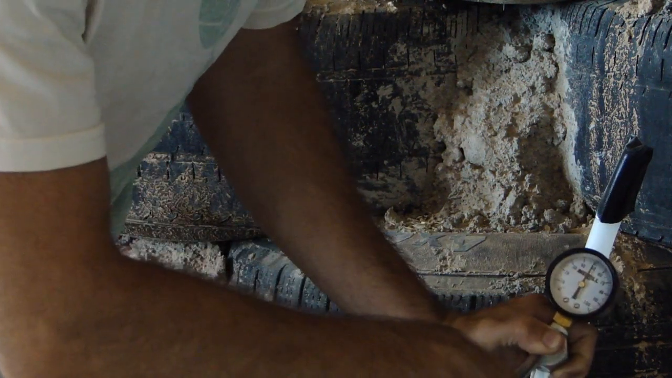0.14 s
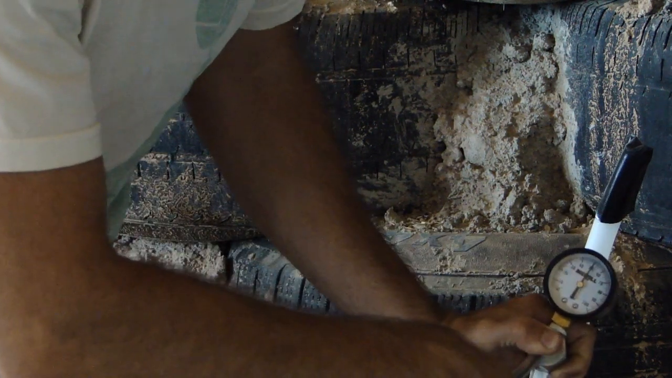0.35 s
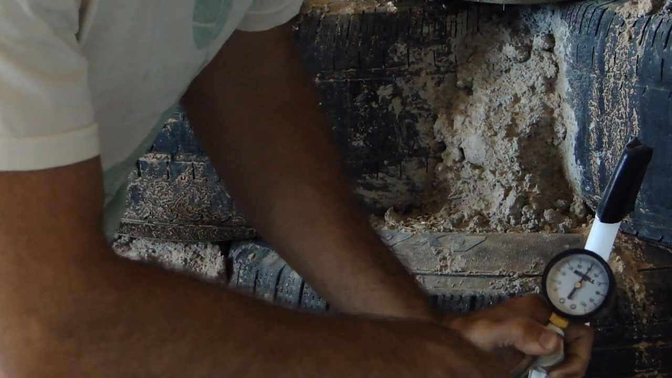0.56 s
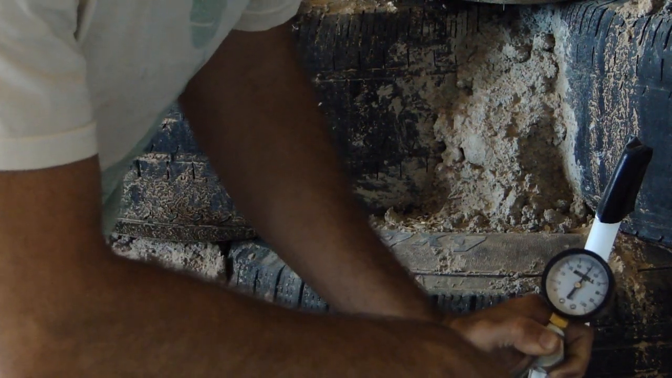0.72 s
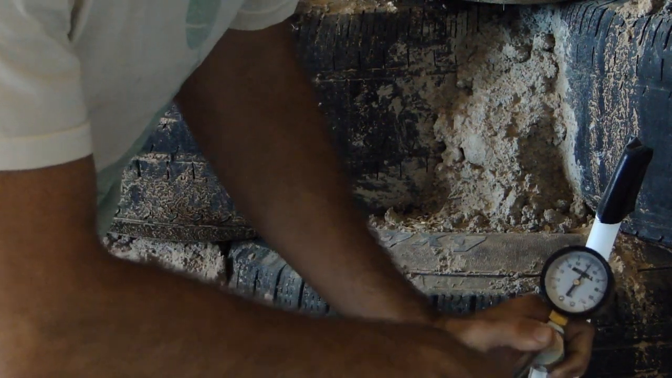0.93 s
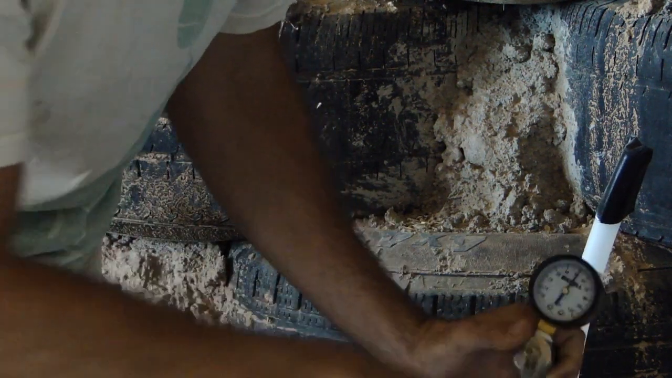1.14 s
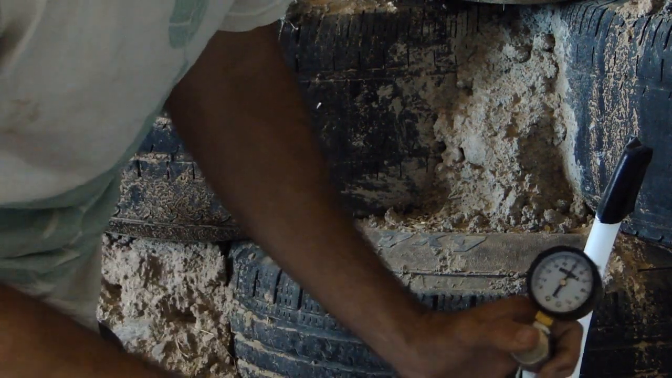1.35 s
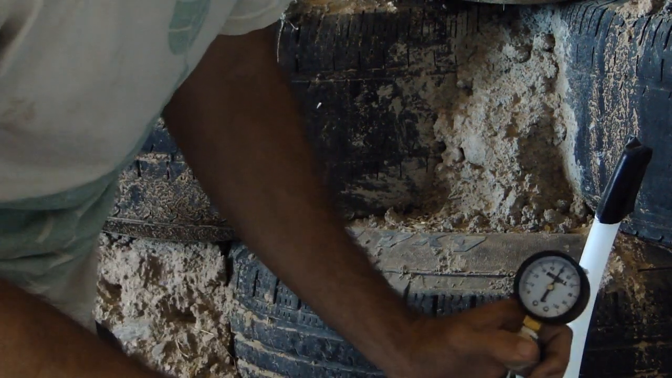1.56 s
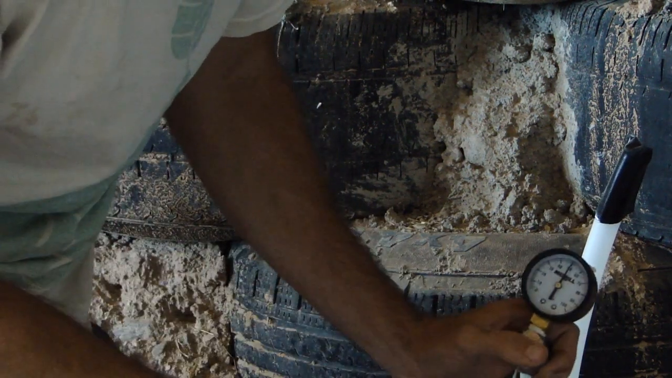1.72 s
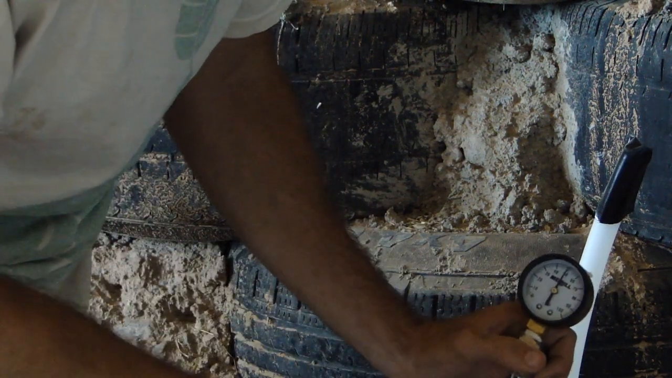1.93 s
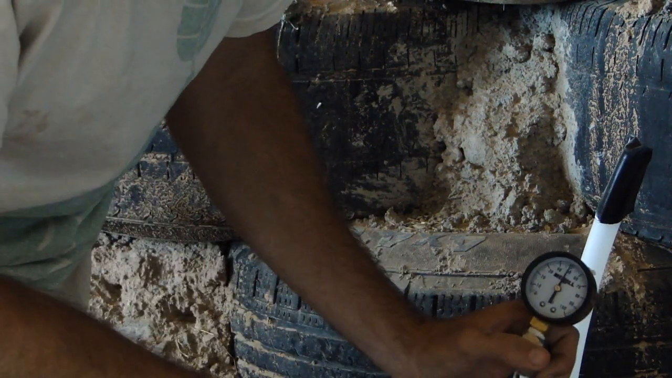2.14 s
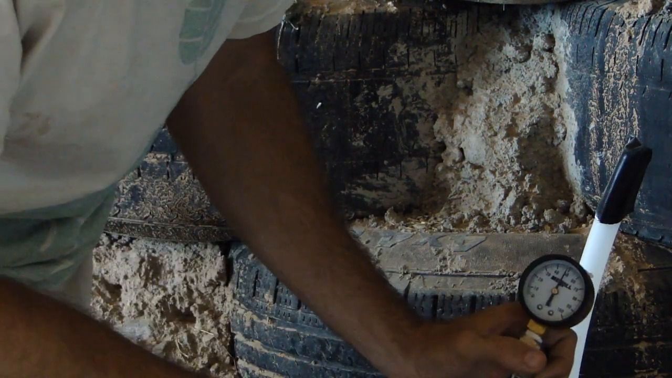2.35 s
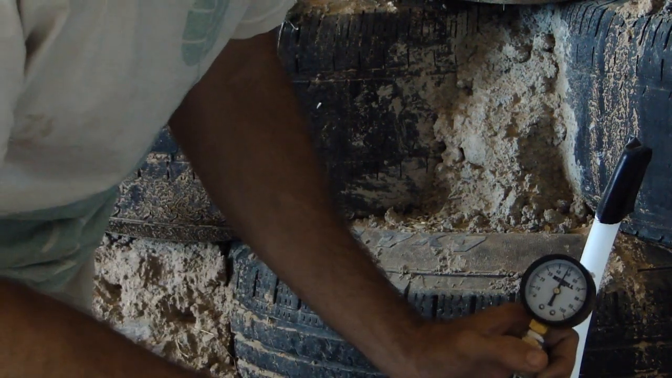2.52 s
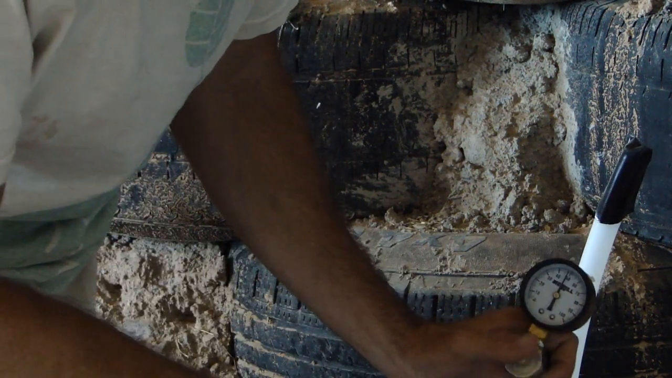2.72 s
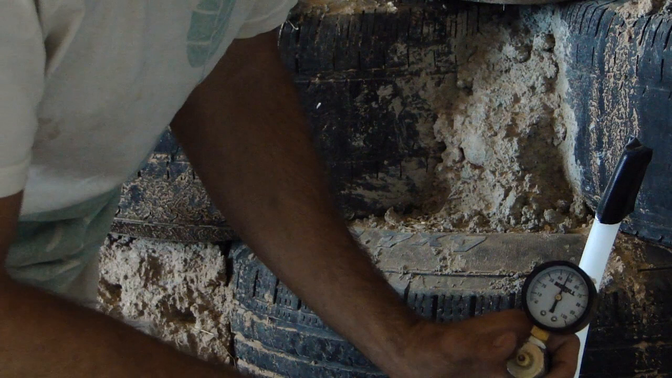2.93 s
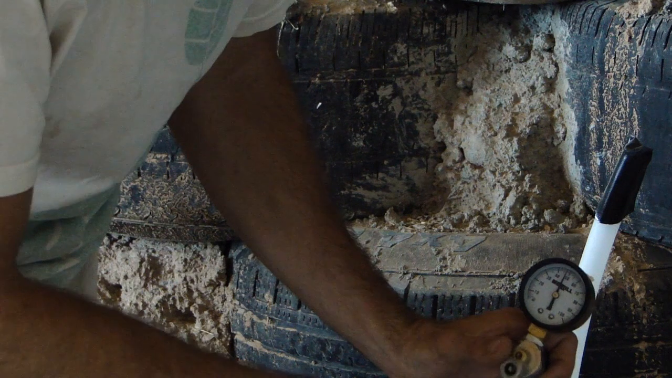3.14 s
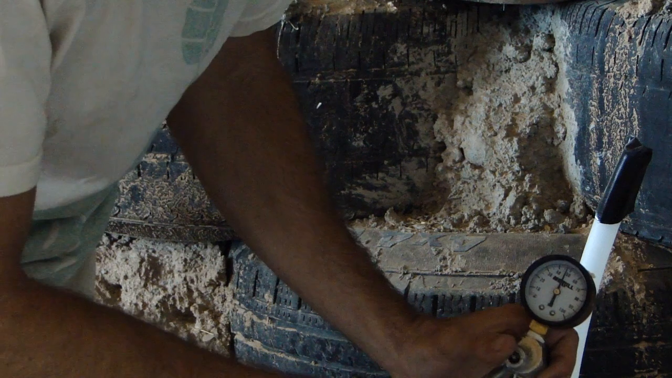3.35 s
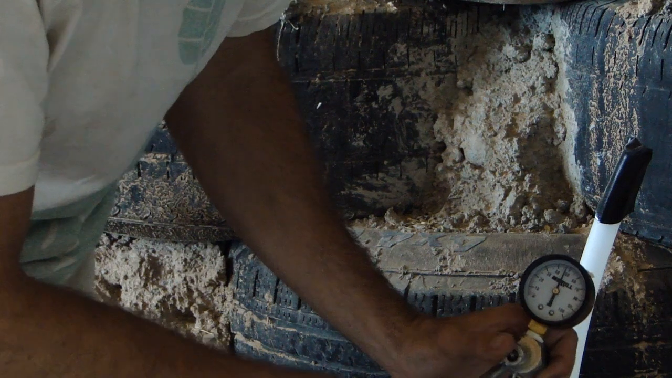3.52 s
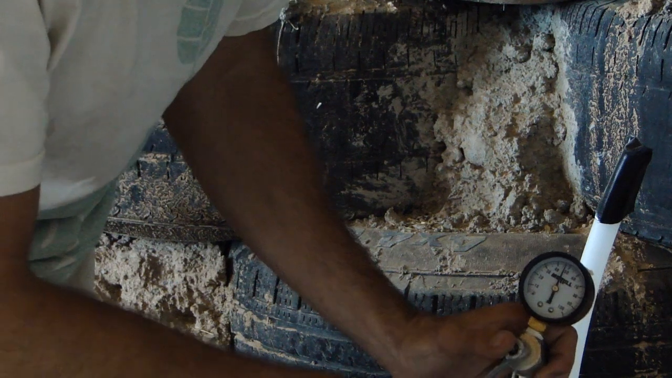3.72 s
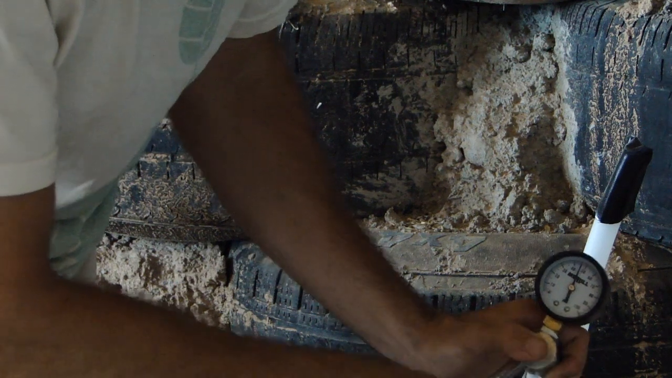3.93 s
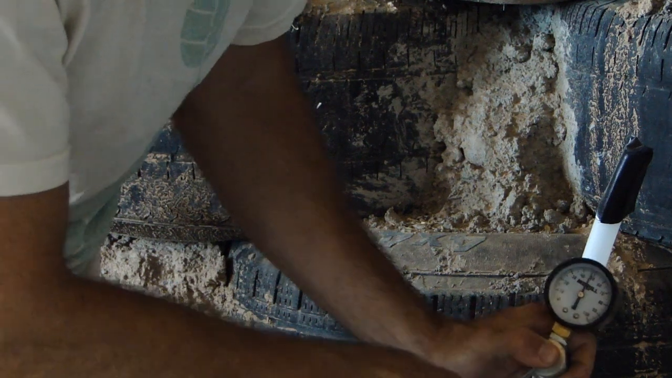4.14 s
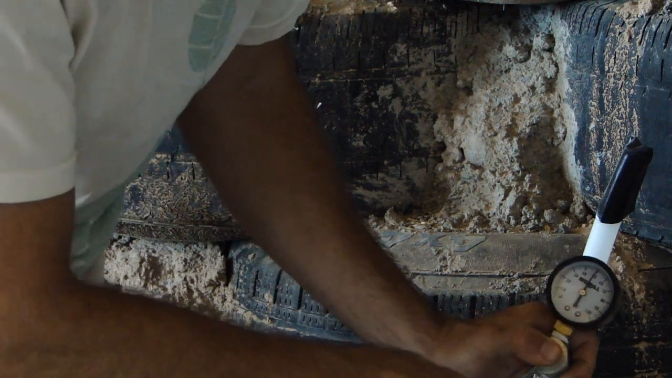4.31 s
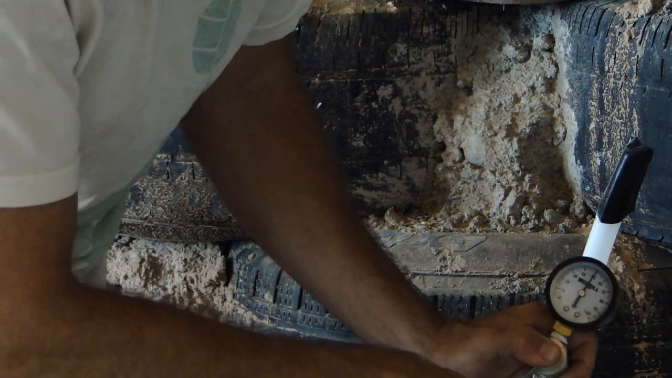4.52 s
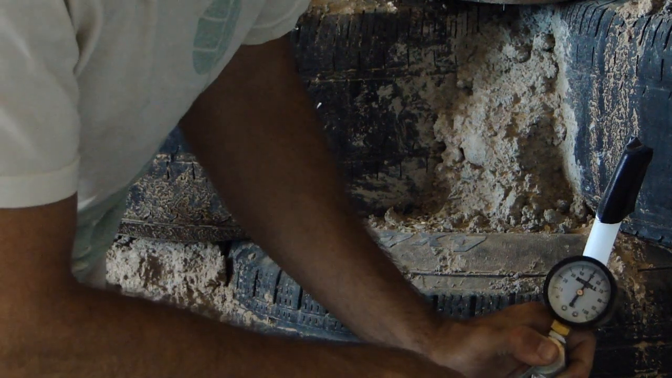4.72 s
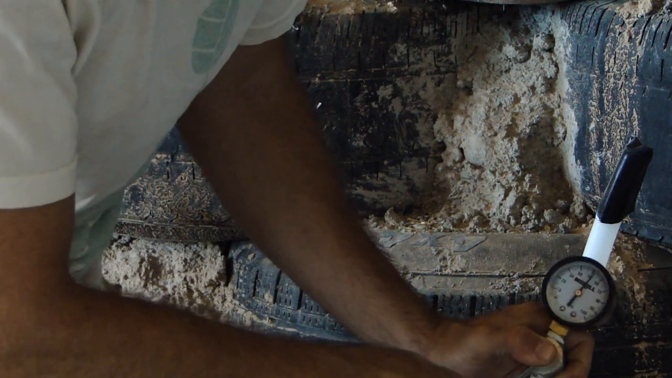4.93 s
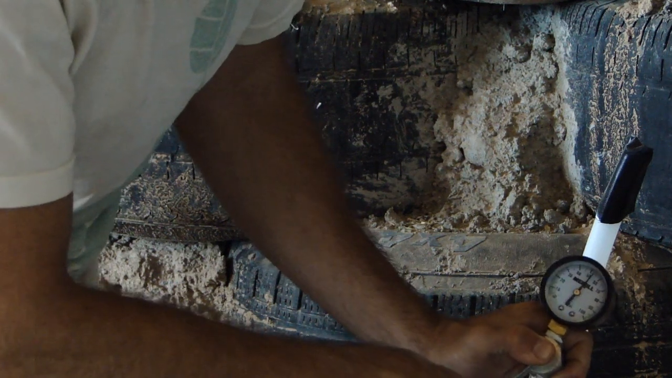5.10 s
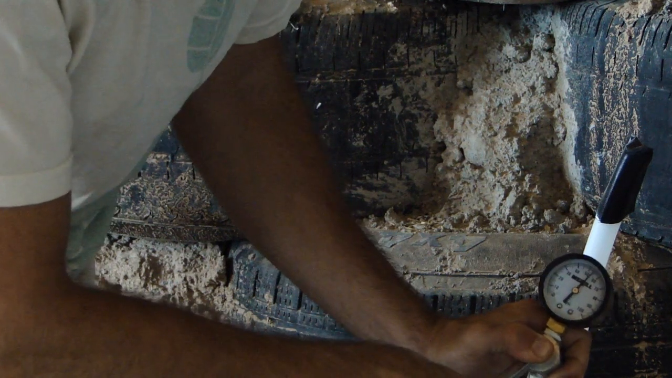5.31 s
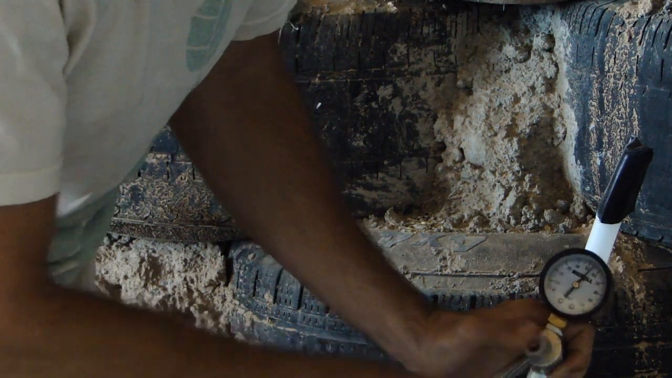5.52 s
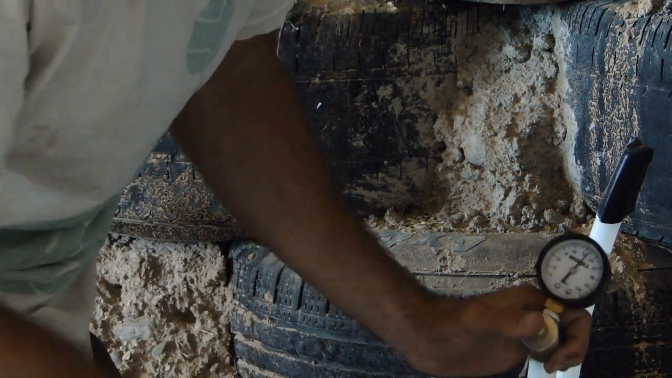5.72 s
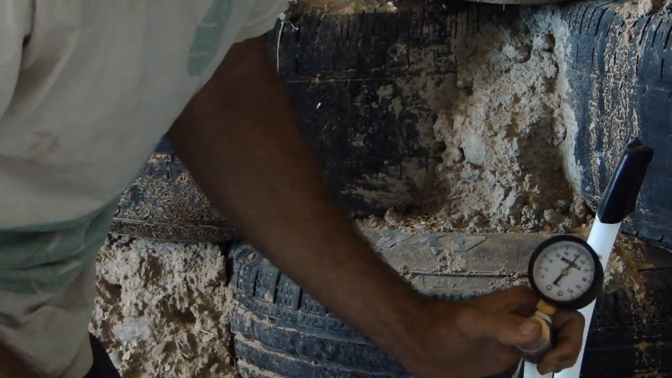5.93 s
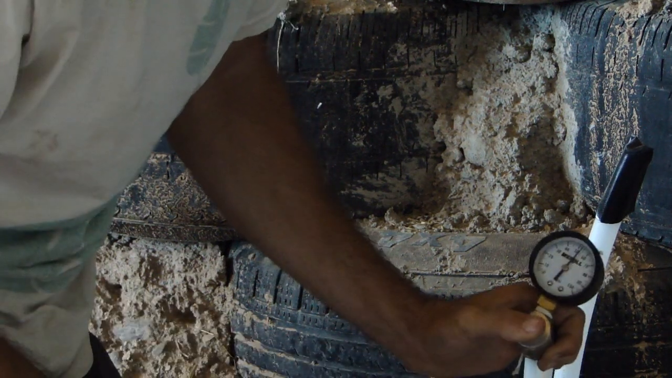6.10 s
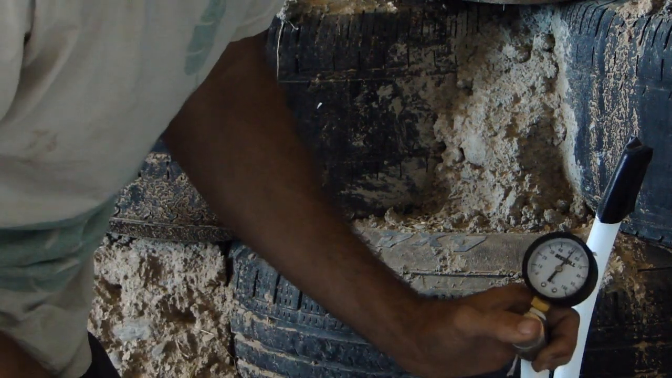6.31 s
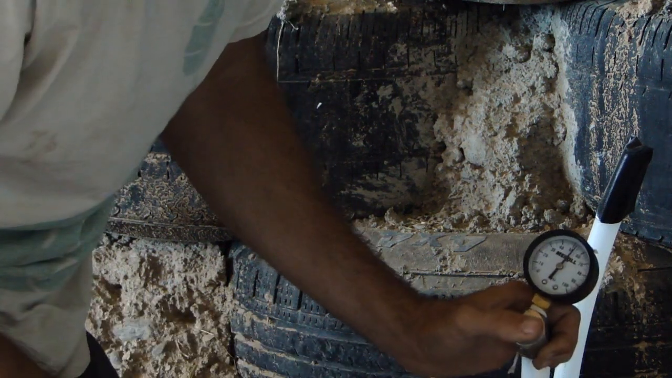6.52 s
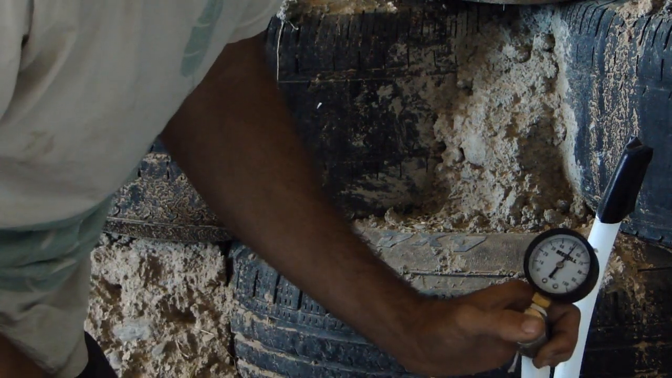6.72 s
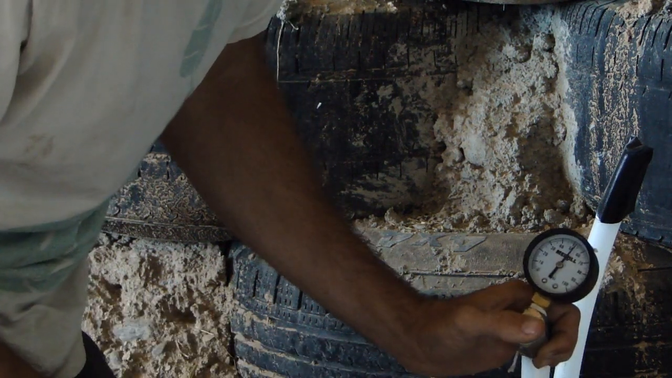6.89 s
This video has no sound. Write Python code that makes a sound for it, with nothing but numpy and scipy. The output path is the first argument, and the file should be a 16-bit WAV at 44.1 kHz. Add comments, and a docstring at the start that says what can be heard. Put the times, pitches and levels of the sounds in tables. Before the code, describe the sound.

In a small rough-walled room, heard close in stereo, air seeps past a rubber seal with a fine hiss and a thin, wavering, fading whistle. A soft brass scrape and dull knock come at 0.7 s, then at 0.9 s a sharp, bright blast of compressed air, about a fifth of a second, with a low rush inside it. A very faint whistle trails near 1.1-1.25 s. Quiet handling follows: a scrape and bump at 1.35, a dull knock at 1.9, tiny ticks around 2.9-3.6. At 3.73 s a softer spurt with a squeak runs into a second, brighter puff at 3.9. From 4.1 s fine hiss leaks again, with a scrape at 4.4 and a growing whistle, until another strong, short blast at 5.42. A faint whistle resumes at 5.67 and stops near 6.2; a soft knock at 6.4 leaves quiet background and barely audible far hum.

```python
"""Blasts of compressed air escape as an air chuck is seated on, or pulled off, the valve of a pipe's test gauge.
The place is a small rough-walled room; the valve sits close to a stereo pair of microphones.
Each blast is a bright noise jet ringing the cavities, with a low rush swelling behind it.
Between blasts, filtered noise seeps past the seal and the valve whistles thinly; short brass ticks,
dull knocks on the pipe and a quiet diffuse background with a faint far hum fill in."""
import sys
import numpy as np
from scipy import signal
from scipy.fft import rfft, irfft, next_fast_len
from scipy.io import wavfile
from scipy.ndimage import uniform_filter1d

SR = 44100
rng = np.random.default_rng(int(sys.argv[2]) if len(sys.argv) > 2 else 0)


def output_pcm(signal):
    """Save a mono or channel-first signal as 16-bit PCM at the path in sys.argv[1].

    Samples are clipped to [-1, 1] before scaling.
    """
    pcm = np.clip(np.atleast_2d(signal).T, -1, 1) * 32767
    wavfile.write(sys.argv[1], SR, np.round(pcm).astype(np.int16))


N = 306759
TIME = np.arange(N) / SR   # s
PADDED = next_fast_len(N, real=True)
FREQS = np.fft.rfftfreq(PADDED, 1 / SR)   # Hz

# Levels in the tables are relative: each layer's own level and the room mix come on top.
# Blasts of air [t/s, attack/s, hold from the start/s, jet level/dB, sag while held/(dB/s),
#   time the rush swells/s, rush level/dB, low edge of the rush f/Hz, lift of the cavity ring/dB]
BLASTS = [ (0.901, 0.027, 0.09, -10, 68.5, 0.067, -27, 120, 5.5),
          (3.734, 0.045, 0.17, -17.5, 5, .09, -34.5, 270, 7.5),
          (3.901, 0.02, 0.08, -13.5, 47, 0.08, -41.5, 185, 1.5),
          (5.424, 0.021, 0.08, -10, 72, 0.088, -28.5, 140, 0)]
# Jet colour, one list per blast, set by the angle of the chuck [f/Hz, level/dB per Hz]
JET_COLOURS = [
    [(240, -52), (400, -21.5), (524, -10), (1080, -8), (1280, -1), (2650, -6), (3150, -1), (6790, -3),
     (10900, -0.5), (12000, -8), (15600, -40.5), (22000, -120)],
    [(240, -47), (400, -26), (738, -17.5), (827, -13.5), (2270, -6.5), (2400, -8), (4430, -1.5), (6600, -3),
     (7190, -0.5), (12000, 0), (15600, -32), (22000, -120)],
    [(240, -50.5), (400, -32), (980, -11), (1070, -16.5), (1210, -7), (2210, -2.5), (2980, 0.5), (6600, -1),
     (11000, 0), (12000, -2.5), (15600, -38.5), (22000, -120)],
    [(240, -46.5), (400, -32.5), (697, -17), (850, -12.5), (3150, -0.5), (3530, -2), (6330, -3),
     (7090, -5.5), (11000, -1.5), (12000, -10.5), (15600, -40), (22000, -120)],
]
# Dull rush behind the jet [f/Hz, level/dB per Hz]
RUSH_COLOUR = [(140, -3.5), (220, -2), (400, 2), (700, 1), (1000, 5), (1400, 5), (2200, 10), (5000, -42)]
# Pipe resonances in which the rush booms [f/Hz, width/Hz, level/dB]
PIPE_MODES = [(174.8, 14, 11), (308, 72, 3), (395, 34, 5.5), (529.7, 48, 9), (800, 190, 2.5),
              (991, 60, -8.5)]
# Resonances of the chuck and valve cavities [f/Hz, width/Hz, level/dB]
CAVITIES = [(1284, 36, -1), (1746, 30, -13), (2480, 35, 3.5), (2660, 27.7, 1), (2848, 25, 0), (3216, 18, 8),
            (4210, 110, -2), (4603, 29, -4), (5060, 61, 2), (5446, 35, -5.5), (6270, 44, -4),
            (6750, 77, -6.5), (7480, 54, -13.5), (9170, 24, -12.5), (9130, 40, -15), (9870, 60, -4),
            (10550, 40, -5), (11200, 110, 0.5), (11405, 30, 0.5)]
# Reflection off the hand [delay/s, strength]
HAND_ECHO = [(.00422, -0.073)]
# Chuck on the valve, air seeping past its seal [start t/s, end t/s, level/dB]
SEEPS = [(-.2, 0.913, -52), (4.09, 5.42, -52)]
# Colour of the seepage [f/Hz, level/dB per Hz]
SEEP_COLOUR = [(60, -43.5), (400, -9), (1500, -15), (3000, -15), (3900, -8), (4700, -7.5), (6300, -16.5),
               (7200, -11), (8400, -13.5), (9050, -14.5), (9900, -4.5), (10500, -3), (11200, -5.5),
               (11900, -8.5)]
# Edge tones of the seal [f/Hz, width/Hz, level/dB]
SEEP_TONES = [(3600, 100, -8.5), (4300, 70, -2), (5660, 120, -10), (6050, 60, 5.5), (6770, 50, -0.5),
              (7000, 76, -3.5), (7800, 70, 0), (8930, 35, 3), (9290, 90, 6), (9900, 40, -0.5),
              (10050, 45, -4.5), (10520, 70, -5.5), (10980, 60, -4)]
# Squeaks of the seal as it beds in [t/s, level/dB, f/Hz]
SQUEAKS = [(.325, -52, 4400), (3.743, -24, 5415), (4.145, -44, 4370)]
# Reflections off the gauge and the wall behind it [delay/s, strength]
NEAR_ECHOES = [(.00063, -.17), (.00119, -.15), (.00281, .2), (.00324, .17), (.0052, -.2)]
# Air flowing through the valve core [start t/s, end t/s, level at the start/dB, change/(dB/s)]
VALVE_FLOWS = [(-.05, .89, -55.5, -8), (1.122, 1.253, -58.5, -22), (4.4, 5.42, -73, 13.5),
               (5.67, 6.23, -56.5, -5)]
# Resonances of the valve core [f/Hz, width/Hz, level/dB]
VALVE_MODES = [(2090, 63, -1), (2172, 32, -1.5), (2480, 300, -21.5), (3970, 230, -3.5), (4430, 300, -16),
               (3515, 200, -8.5), (5180, 200, -25), (5500, 260, -10.5), (6380, 90, -18.5), (7060, 260, -18),
               (8530, 600, -12)]
# Fittings touching [t/s, level/dB, swell/s, ring of the valve body/dB, contact f/Hz, contact level/dB]
TICKS = [(.705, -45.5, .012, -25, 800, 2.5), (1.35, -41, 0.022, -12, 2600, -6),
         (2.880, -52.5, .0002, -25, 3030, 9), (2.883, -52, .0002, -21, 2320, 2),
         (3.005, -57, 0.011, -23, 3170, 10), (3.225, -38.5, 0.0063, 5.5, 623, -1.5),
         (3.364, -47, 0.0132, -8, 613, 5), (3.435, -45.5, 0.0098, -22.5, 4240, -3),
         (3.608, -39.5, 0.0011, 1.5, 2800, -6), (4.409, -35, 0.01, -25, 1330, 2),
         (4.426, -53.5, 0.0027, -20, 3230, 11)]
# Colour of the fittings' scrape [f/Hz, level/dB per Hz]
SCRAPE_COLOUR = [(60, -33), (200, -25), (600, 1.5), (1400, 1), (3100, 3), (4400, -6), (7000, -12.5),
                 (12000, -15)]
# Soft knocks of hands on the pipe [t/s, level/dB]
BUMPS = [(.71, -58), (1.355, -49.5), (1.865, -44.5), (3.056, -48.5), (6.41, -44.5)]
# Colour of the knocks [f/Hz, level/dB per Hz]
BUMP_COLOUR = [(50, -44), (110, -15), (190, -10), (290, 9.5), (450, -2), (800, -11.5), (2500, -38),
               (8000, -48)]
# Decay of the room by 60 dB [f/Hz, decay t/s]
ROOM_T60 = [(150, 0.2), (1000, 0.3), (4000, 0.29), (11000, 0.12)]
# Room reflections: the long waves reach both microphones alike [f/Hz, left-right likeness]
ROOM_LIKENESS = [(150, 0.91), (600, .45), (1400, 0.36), (3000, .1), (6000, -.05), (10000, -.3)]
# Colour of the background [f/Hz, level/dB per Hz]
AMBIENCE_COLOUR = [(15, -64), (25, -35), (96, -17), (127, -8), (276, -1.5), (527, -2), (569, -2), (883, -4),
                   (1140, -6.5), (1340, -6), (2070, -9), (2360, -11), (9270, -22.5), (11100, -23.5),
                   (12000, -41.5), (15600, -65.5), (22000, -120)]
# Likeness of the background at the two microphones [f/Hz, left-right likeness]
AMBIENCE_LIKENESS = [(60, 0.23), (170, 0.43), (500, 0.05), (1460, 0.2), (4230, 0.52), (12300, 0.75)]
# Faint far hum [f/Hz, level/dB]
HUM = [(586.8, -71.5), (1168, -74.5)]

JET_FALL_DB_PER_S = 208   # once the hold is over, the pressure drains
RUSH_RISE_DB_PER_S, RUSH_FALL_DB_PER_S = 150.5, 113.5
BLAST_S, SHUT_DB_PER_S = 0.24, 449.5   # the gap shuts this long after it opened, and this fast
BEDDING_DB, BEDDING_S = 3, 0.17   # a fresh seal leaks this much more, until the rubber beds in
LEAK_ATTACK_S, LEAK_FALL_DB_PER_S = 0.014, 109.5   # seep and whistle start and stop alike
BODY_T60 = 0.07   # ring of the valve body, s
AMBIENCE_DB = -56   # rms of the background, left and right averaged
CUTOFF_HZ = 11880


def blasts(jet_db=0.0, rush_db=-0.5, dull_hz=4500, dulls_below_db=-1.0):
    """A jet rings the cavities and dulls as pressure falls; a low, lumpy rush swells as the gap widens."""
    out = 0
    rush_gain = colour(RUSH_COLOUR) * resonant(PIPE_MODES + CAVITIES, lift_db=6.0)
    lumps = flutter(rate_hz=21, depth_db=3.0)
    low_pass = signal.butter(1, dull_hz, fs=SR, output="sos")
    for blast, spectrum in zip(BLASTS, JET_COLOURS):
        start, attack, hold, db, sag, swell, swell_db, edge_hz, ring_db = blast
        flow = envelope(start, attack, hold, -sag, JET_FALL_DB_PER_S)
        bright = noise(colour(spectrum) * resonant(CAVITIES, ring_db) * comb(HAND_ECHO))
        dull = signal.sosfilt(low_pass, bright)
        force = np.minimum(flow / from_db(dulls_below_db), 1) ** 0.45
        jet = from_db(jet_db + db) * flow * (force * bright + (1 - force) * dull)

        gap = envelope(start, attack, swell, RUSH_RISE_DB_PER_S, RUSH_FALL_DB_PER_S)
        above_edge = FREQS ** 4 / (FREQS ** 4 + edge_hz ** 4)
        rush = from_db(rush_db + swell_db) * gap / gap.max() * lumps * noise(rush_gain * above_edge)

        shut = from_db(-SHUT_DB_PER_S * np.maximum(TIME - start - BLAST_S, 0))
        out = out + shut * (jet + rush)
    return out * flutter(rate_hz=31, depth_db=0.5)


def seep(level_db=6.0, squeak_width_hz=110, squeak_t60=0.327):
    """Fine hiss through the narrow gap at the rubber seal, easing as it beds in, with brief squeaks."""
    flow = 0
    for start, end, db in SEEPS:
        fresh = np.exp(-np.maximum(TIME - start, 0) / BEDDING_S)
        opening = envelope(start, LEAK_ATTACK_S, end - start, 0, LEAK_FALL_DB_PER_S)
        flow = flow + from_db(db + BEDDING_DB * fresh) * opening
    hiss = noise(colour(SEEP_COLOUR) * resonant(SEEP_TONES, lift_db=4.0) * comb(NEAR_ECHOES))
    squeaks = 0
    for start, db, hz in SQUEAKS:
        tone = noise(peak(hz, squeak_width_hz) ** 2)
        squeaks = squeaks + from_db(db) * strike(start, 0.0061, squeak_t60) * tone
    return from_db(level_db) * flow * hiss * flutter(rate_hz=15, depth_db=2.0) + squeaks


def whistle(level_db=0.0, hiss_db=-4.5):
    """Turbulence in the valve core hisses and excites its resonances: a thin, wavering whistle."""
    flow = 0
    for start, end, db, slope in VALVE_FLOWS:
        opening = envelope(start, LEAK_ATTACK_S, end - start, slope, LEAK_FALL_DB_PER_S)
        flow = flow + from_db(db) * opening
    tones = 0
    for hz, width, db in VALVE_MODES:
        tones = tones + from_db(db) * steadier(noise(peak(hz, width) ** 2), share=0.4)
    hiss_gain = colour([(100, -34.5), (2000, 1.0), (6000, -4), (11500, -6)])
    hiss = noise(hiss_gain * resonant(CAVITIES, lift_db=9.5) * comb(NEAR_ECHOES))
    wavering_flow = flow * flutter(rate_hz=9, depth_db=1.5)
    return from_db(level_db) * wavering_flow * (tones + from_db(hiss_db) * hiss)


def ticks(ring_hz=2090, scrape_t60=0.059, contact_width_hz=400):
    """Brass meets brass with a short scrape, pitched by the spot touched, and the valve body rings on."""
    out = 0
    scrape = noise(colour(SCRAPE_COLOUR) * comb(NEAR_ECHOES))
    no_bass = colour([(60, -29), (400, 9.0)])   # small parts radiate no long waves
    for start, db, swell, ring_db, hz, contact_db in TICKS:
        contact = from_db(contact_db) * noise(no_bass * peak(hz, contact_width_hz) ** 2)
        cycles = ring_hz * (TIME - start) + rng.random()
        ring = from_db(ring_db) * np.sin(2 * np.pi * cycles)
        # a gentle touch also slides on for longer
        touch = (scrape + contact) * strike(start, swell, scrape_t60 + 1.9 * swell)
        out = out + from_db(db) * (touch + ring * strike(start, swell, BODY_T60))
    return out


def bumps(rise_s=0.01, t60=0.221):
    """Dull, soft knocks as the grip shifts: low noise under struck envelopes."""
    knocks = sum(from_db(db) * strike(start, rise_s, t60) for start, db in BUMPS)
    return noise(colour(BUMP_COLOUR)) * knocks


def room_response():
    """Dense reflections, partly different at each microphone; the high treble dies first."""
    age = TIME[:SR // 2]
    hz = np.fft.rfftfreq(len(age), 1 / SR)
    white = stereo_noise(ROOM_LIKENESS, size=len(age)) / np.sqrt(2)
    edges = [0, 300, 700, 1500, 3000, 5000, 8000, SR / 2]   # Hz
    out = 0
    for low, high in zip(edges, edges[1:]):
        t60 = at_hz(ROOM_T60, (low + high) / 2)
        decay = from_db(-60 * age / t60) * (1 - np.exp(-age / 0.002))
        band = irfft(white * ((hz >= low) & (hz < high)), len(age))
        out = out + band * decay / np.linalg.norm(decay)
    return out


def in_room(x, response, wet_db):
    """Direct sound plus reflections, scaled to about the same total power."""
    wet = from_db(wet_db)
    reflections = signal.fftconvolve(x[None], response, axes=1)[:, :N]
    return (x + wet * reflections) / np.hypot(1, wet)


def ambience(level_db=0.0, hum_db=2.0, hum_width_hz=8):
    """Diffuse background noise, partly alike at both microphones, with a faint far hum of narrow noise."""
    spectra = stereo_noise(AMBIENCE_LIKENESS, size=PADDED) * colour(AMBIENCE_COLOUR)
    air = irfft(spectra, PADDED)[:, :N]
    hum = sum(from_db(db + hum_db) * noise(peak(hz, hum_width_hz) ** 2) for hz, db in HUM)
    return from_db(AMBIENCE_DB + level_db) * air / np.std(air.mean(axis=0)) + hum


def envelope(start, attack_s, hold_s, slope_db_per_s, fall_db_per_s):
    """A gap opens, is held while its level drifts, then closes; the hold counts from the start."""
    age = np.maximum(TIME - start, 0)
    attack = np.sin(np.pi / 2 * np.minimum(age / attack_s, 1)) ** 2
    drift_db = slope_db_per_s * np.minimum(age, hold_s)
    fall_db = fall_db_per_s * np.maximum(age - hold_s, 0)
    return attack * from_db(drift_db - fall_db)


def strike(start, rise_s, t60):
    """Envelope that swells quickly and dies away."""
    age = np.maximum(TIME - start, 0)
    return (1 - np.exp(-age / rise_s)) * from_db(-60 * age / t60)


def flutter(rate_hz, depth_db):
    """Turbulence: a random wobble of gain, its depth in dB rms."""
    return from_db(depth_db * noise(1 / (1 + (FREQS / rate_hz) ** 2)))


def steadier(x, share):
    """A self-sustained tone holds its strength better than noise does."""
    strength = uniform_filter1d(np.abs(x), SR // 300) + 1e-6
    return rms_one(x / strength ** np.clip(share, 0, 1))


def noise(gain):
    """Noise at unit rms with the given gain at each frequency."""
    return rms_one(irfft(rfft(rng.standard_normal(PADDED)) * gain, PADDED)[:N])


def stereo_noise(likeness, size):
    """Spectra of two white noises that are partly alike."""
    alike = np.clip(at_hz(likeness, np.fft.rfftfreq(size, 1 / SR)), -1, 1)
    mid, side = rfft(rng.standard_normal((2, size)))
    return np.sqrt(1 + alike) * mid + np.sqrt(1 - alike) * side * [[1], [-1]]


def colour(points):
    """Gain at each frequency from a short spectrum."""
    return from_db(at_hz(points, FREQS))


def peak(hz, width_hz):
    """Gain of one resonance, 1 on top."""
    return 1 / np.sqrt(1 + (2 * (FREQS - hz) / width_hz) ** 2)


def resonant(modes, lift_db):
    """Gain of resonances standing out of a flat base."""
    power = sum((from_db(db + lift_db) * peak(hz, width)) ** 2 for hz, width, db in modes)
    return np.sqrt(1 + power)


def comb(echoes):
    """Gain ripple that close reflections leave."""
    reflected = sum(strength * np.exp(-2j * np.pi * FREQS * delay) for delay, strength in echoes)
    return np.abs(1 + reflected)


def at_hz(points, hz):
    """Read a table along log frequency."""
    f, value = np.transpose(points)
    return np.interp(np.log(np.maximum(hz, 1)), np.log(f), value)


def from_db(db):
    """Decibels to gain."""
    return 10 ** (np.asarray(db) / 20)


def rms_one(x):
    """Scale to unit rms."""
    return x / np.sqrt(np.mean(x ** 2) + 1e-20)


def scene(pan_db=-0.2):
    """The valve is close to the microphones; jets and leaks spray into the room in their own shares."""
    response = room_response()
    loud = in_room(blasts(), response, wet_db=-3.5)
    leaks = in_room(seep() + whistle(), response, wet_db=-1.0)
    handling = in_room(ticks() + bumps(), response, wet_db=-3.0)
    return (loud + leaks + handling) * from_db([[pan_db], [-pan_db]]) + ambience()


def record(dry):
    """The treble stops steeply at the cutoff."""
    top = 1 / np.sqrt(1 + (FREQS / CUTOFF_HZ) ** 400)
    return irfft(rfft(dry, PADDED) * top, PADDED)[:, :N]


dry = scene()
out = record(dry)
output_pcm(out)
```